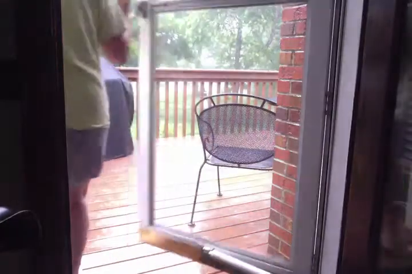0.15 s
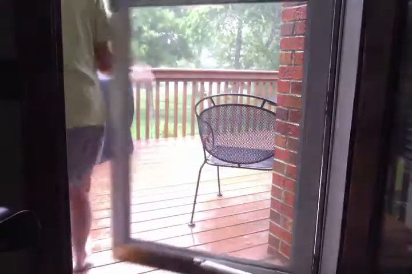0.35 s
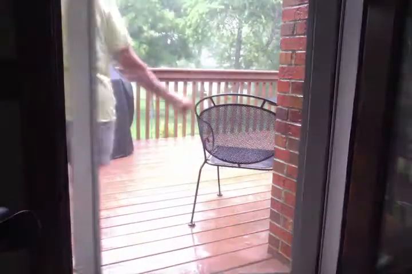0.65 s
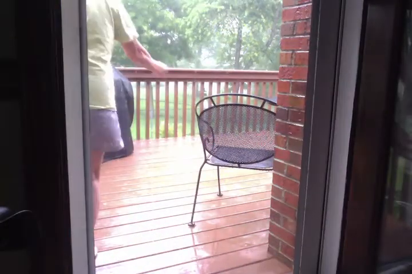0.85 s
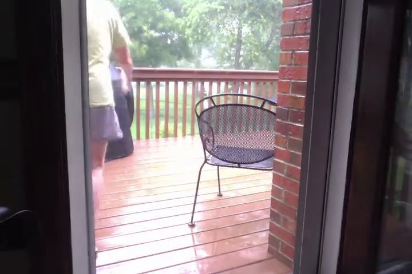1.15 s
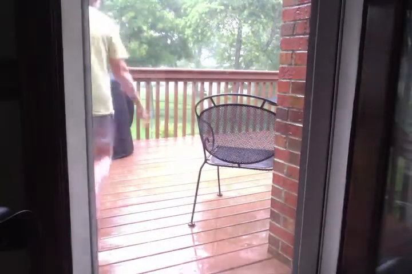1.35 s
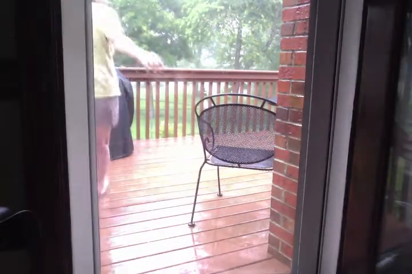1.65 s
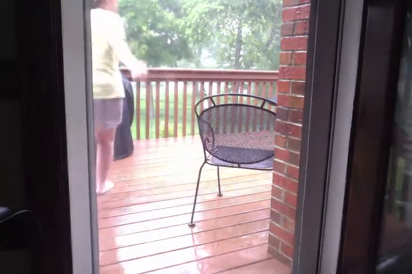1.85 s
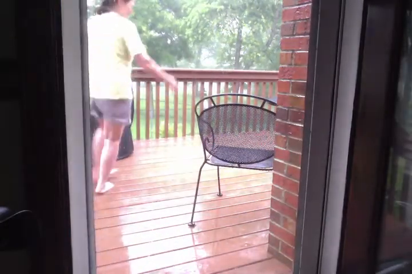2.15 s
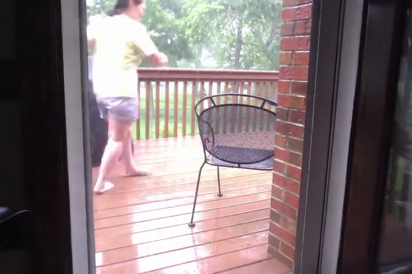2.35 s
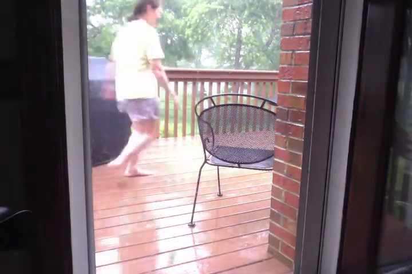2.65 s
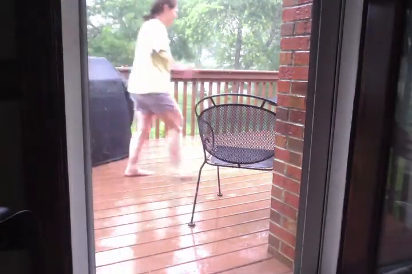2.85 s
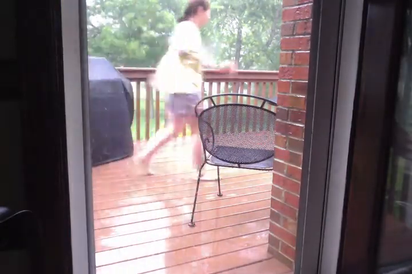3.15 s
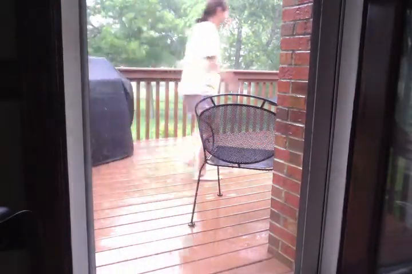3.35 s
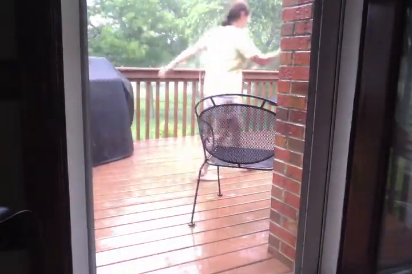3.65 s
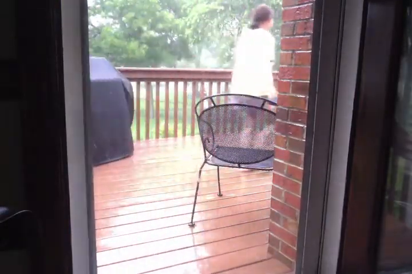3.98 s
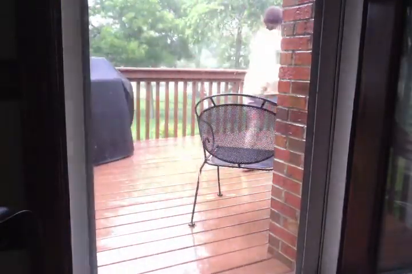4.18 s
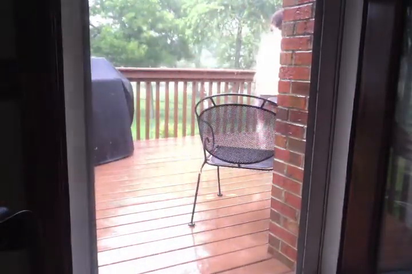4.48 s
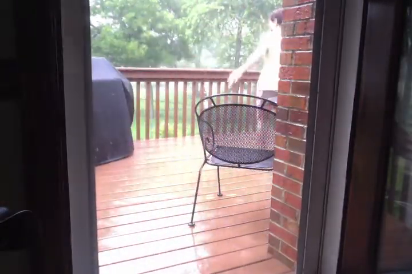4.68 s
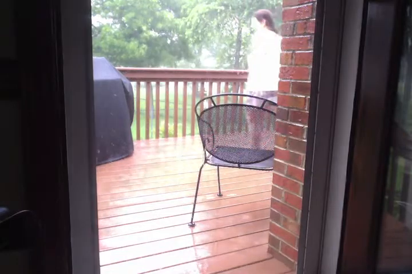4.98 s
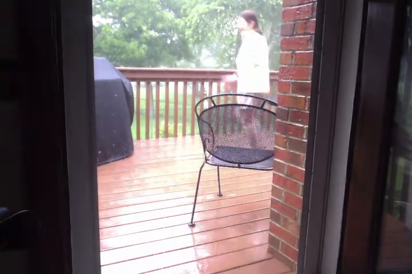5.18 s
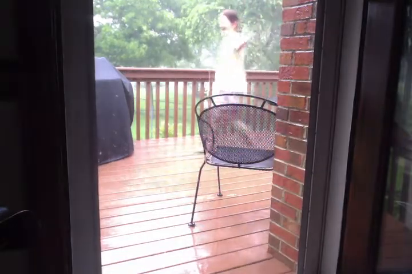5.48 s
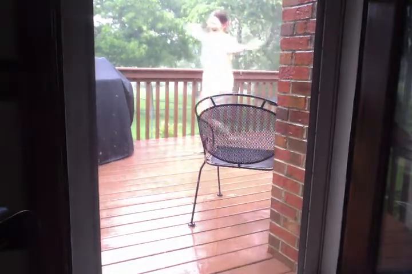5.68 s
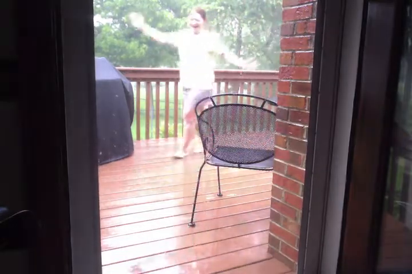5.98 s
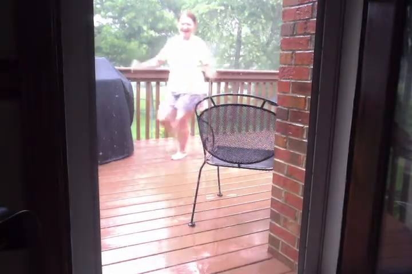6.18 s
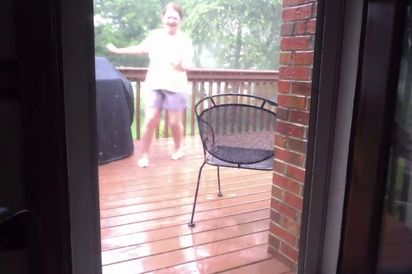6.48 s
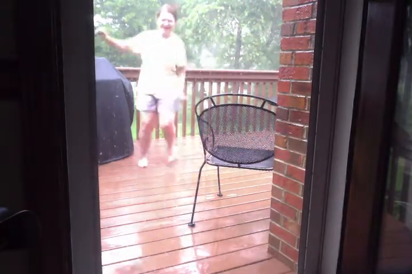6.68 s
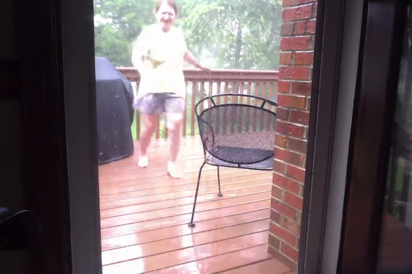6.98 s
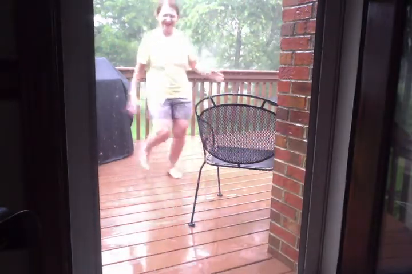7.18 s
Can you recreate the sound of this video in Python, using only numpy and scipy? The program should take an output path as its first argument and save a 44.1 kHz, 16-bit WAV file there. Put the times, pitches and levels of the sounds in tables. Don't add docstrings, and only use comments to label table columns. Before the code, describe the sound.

Heard from inside a hallway, heavy rain patters on a wooden deck. A storm door rattles and knocks open, its hinge giving a brief high squeal, then swings back and the rain drops to a dull wash. Drips tick, the air closer hisses faintly, and two very loud metallic latch clacks shut it. Small ticks follow over muffled rain.

```python
import sys
import numpy as np
from scipy import signal
from scipy.fft import rfft, irfft, next_fast_len
from scipy.io import wavfile
from scipy.ndimage import uniform_filter1d, map_coordinates

SR = 44100
rng = np.random.default_rng(int(sys.argv[2]) if len(sys.argv) > 2 else 0)


def int16_out(signal):
    q = np.round(np.clip(np.atleast_2d(signal).T, -1, 1) * 32767)
    wavfile.write(sys.argv[1], SR, q.astype(np.int16))


def attenuation_scalar(level_db):
    decades = np.asarray(level_db, float) / 20
    return 10 ** decades


N = 323253
TOP_HZ = 15900

# start in seconds, rms level in dB, rattle length in seconds.
LATCH_BLOWS = [
    (5.1416, -7, 0.0085),
    (5.546, -29.5, 0.0036),
    (5.5482, -9, 0.0097),
]


def unit(x):
    return x / np.sqrt(np.mean(x ** 2) + 1e-20)


def along(points, hz):
    f, v = np.transpose(points)
    return np.interp(np.log(hz + 1), np.log(f + 1), v)


def curves(rows):
    s, *cols = np.transpose(rows)
    t = np.arange(N) / SR
    gate = np.clip(np.minimum(t - s[0], s[-1] - t) / 0.004, 0, 1)
    return [np.interp(t, s, c) for c in cols] + [gate]


def wobble(rate_hz, size=N):
    knots = rng.standard_normal(int(N * rate_hz / SR) + 4)
    return map_coordinates(knots, [np.arange(size) * rate_hz / SR])


def filtered(x, response):
    m = next_fast_len(len(x) + 2048)
    return irfft(rfft(x, m) * response(np.fft.rfftfreq(m, 1 / SR)), m)[:len(x)]


def hump(hz, centre_hz, width_hz):
    return 1j * hz * width_hz / (centre_hz ** 2 - hz ** 2 + 1j * hz * width_hz)


def dying(t60_points):
    hz, t, z = signal.stft(rng.standard_normal(SR // 3), SR, nperseg=256)
    z = z * attenuation_scalar(-60 * t / along(t60_points, hz)[:, None])
    return signal.istft(z, SR, nperseg=256)[1][:SR // 3]


def place(out, s, sound, wet_db):
    # frequency in Hz, t60 in seconds.
    hall_t60 = [(300, 0.35), (2000, 0.25), (5000, 0.21), (12000, 0.14)]
    tail = dying(hall_t60)
    tail = attenuation_scalar(wet_db) * tail / np.linalg.norm(tail)
    wet = signal.fftconvolve(np.pad(sound, (300, 0)), tail)
    both = np.pad(sound, (0, len(wet) - len(sound))) + wet
    return out + np.pad(both, (round(s * SR), N))[:N]


def shower(spectrum, patchy_db, drops_per_s, spread_db, share):
    z = signal.stft(rng.standard_normal(N + 512), nperseg=512)[2]
    field = uniform_filter1d(rng.standard_normal(z.shape), size=6, axis=0)
    field = uniform_filter1d(field, size=10, axis=1)
    wash = signal.istft(z * attenuation_scalar(patchy_db * unit(field)), nperseg=512)[1][:N]
    hits = (rng.random(N) < drops_per_s / SR) * rng.standard_normal(N)
    hits = hits * attenuation_scalar(spread_db * np.minimum(rng.exponential(size=N), 3))
    return unit(filtered(unit(wash) + share * unit(hits),
                         lambda hz: attenuation_scalar(along(spectrum, hz)) * (hz < TOP_HZ)))


def splashes(count):
    draw, k = rng.random((count, 3)), np.arange(600)
    hz = 900 * 5 ** draw[:, 1:2]
    size_db = 20 * draw[:, 2:] ** 3
    grain = attenuation_scalar(size_db - 60 * k * hz / SR / 16) * np.sin(2 * np.pi * hz * k / SR)
    at = (draw[:, :1] * N).astype(int) + k
    return unit(np.bincount(at.ravel(), grain.ravel(), N + len(k))[:N])


def rain():
    # frequency in Hz, density in dB per Hz.
    patter_spectrum = [(150, -21.5), (250, -4.5), (375, -3), (469, -1), (770, 1), (1470, -1.5), (2410, -1),
                       (2840, -5.5), (3400, -4), (9000, -33.5), (11700, -51.5), (19800, -120)]
    drum_spectrum = [(24, -42.5), (40, -14.5), (70, -16), (88, -4), (167, -2), (199, 0.5), (500, -12.5),
                     (650, -31.5), (1100, -120)]
    spray_spectrum = [(2060, -28.5), (3500, -6), (3870, 2), (4260, -3), (4740, -3.5), (5380, -6),
                      (6510, -8), (7440, -7.5), (8130, -16.5), (10100, -16.5), (15100, -26.5), (15900, -27)]
    # time in seconds, level in dB.
    gap_level = [(0.0, -33), (0.14, -33.5), (0.41, -31.5), (0.53, -36), (0.61, -31.5), (0.73, -37),
                 (1.0, -44.5), (1.24, -40), (1.41, -39), (1.86, -40.5), (2.33, -43.5), (3.23, -44.5),
                 (4.41, -47.5), (4.9, -52.5), (5.25, -47.5), (6.5, -52), (6.98, -51.5), (7.33, -53)]
    # time in seconds, share from 0 to 1.
    screening = [(0, 0), (2.8, 0.6), (3.6, 0.54), (5, 0.5), (7.33, 0.99)]

    gap_db = curves(gap_level)[0]
    below_wide_db = gap_db + 32
    screened = curves(screening)[0]
    gust = wobble(1.995)
    patter = attenuation_scalar(gap_db - 1.65 + 0.45 * gust) * shower(
        patter_spectrum, patchy_db=2.5, drops_per_s=1500, spread_db=3.0, share=0.39)
    drum = attenuation_scalar(-50 + 0.67 * below_wide_db + 0.46 * wobble(5.1)) * shower(
        drum_spectrum, patchy_db=3.0, drops_per_s=390, spread_db=4.5, share=0.34)
    spray = attenuation_scalar(-39.5 + 1.515 * below_wide_db + 0.5 * gust) * shower(
        spray_spectrum, patchy_db=1.3, drops_per_s=2600, spread_db=9.5, share=0.27)
    finest = filtered(spray, lambda hz: 1 / (1 + (11500 / (hz + 1)) ** 8))
    near = attenuation_scalar(gap_db - 8.0) * (1 - screened) * splashes(count=900)
    return near + patter + drum + spray - screened * finest


def mains_hum():
    # frequency in Hz, level in dB.
    hum_tones = [(177.6, -62.5)]
    t = np.arange(N) / SR
    return sum(attenuation_scalar(db + 3.5 + 0.9 * wobble(1.5)) * np.sin(2 * np.pi * hz * t + 0.3 * wobble(8))
               for hz, db in hum_tones)


def thumps():
    # start in seconds, peak in dB, frequency in Hz.
    thump_events = [(0.016, -38, 230), (0.09, -37.5, 140), (.15, -43, 240), (.328, -36, 350),
                    (.368, -41, 110), (.52, -48, 105), (.65, -30, 254), (.575, -42, 260), (.61, -30, 340),
                    (0.746, -45, 110), (0.197, -49.5, 137), (0.341, -38, 150), (0.419, -37, 135),
                    (0.468, -45, 110), (0.59, -45, 170), (0.691, -44, 161), (1.019, -52, 176),
                    (1.259, -51, 167)]
    out, t = np.zeros(N), np.arange(SR // 5) / SR
    for s, db, hz in thump_events:
        shape = attenuation_scalar(db + 5.0 - 60 * t / 0.11) * (1 - np.exp(-t / 0.0066))
        out = place(out, s - 0.005, shape * np.sin(2 * np.pi * hz * t), -8.0)
    return out


def door_frame():
    # start in seconds, peak in dB, bright part in dB, thud in dB, centre in Hz.
    knocks = [(.017, -26, -25, -6, 1200), (.051, -12, -36, -18, 1690), (.057, -16.5, -34, -14, 1320),
              (.063, -12.5, -31, -14, 1800), (.068, -4, -12.5, -10, 2000), (.074, -5.5, -20, -25, 1780),
              (.086, -9, -12, -20, 1820), (.092, -10.5, -19.5, -15, 1290), (.102, -21, -30.5, -8, 1400),
              (.329, -11.5, -3.5, -16, 2170), (.577, -14, -7.5, -32, 6450), (.586, -14.5, -14, -29.5, 6700),
              (.599, -18.5, -26, -17, 948), (.614, -21.5, -30.5, -1, 800), (.648, -16, -10, -13, 2030),
              (1.241, -13.5, -14, -21, 2200), (1.254, -20.5, -25.5, -4, 1460)]
    # frequency in Hz, density in dB per Hz.
    frame_spectrum = [(150, -45), (250, -22), (618, -0.5), (2090, -6.5), (4650, -7.5), (5830, -10),
                      (8260, -19), (11500, -21.5), (16000, -33.5)]
    rattle_s = 0.0049

    def bright_modes(hz):
        high = hump(hz, 10500, 1500) ** 2 + hump(hz, 12800, 1300) ** 2
        return high + 0.6 * hump(hz, 15000, 1460) ** 2 + 0.43 * hump(hz, 8000, 6000) ** 2

    out, t = np.zeros(N), np.arange(SR // 8) / SR
    shape = (1 - np.exp(-t / 0.0001)) * attenuation_scalar(-60 * np.maximum(t - rattle_s, 0) / 0.043)
    for s, db, bright_db, thud_db, centre_hz in knocks:
        noise = rng.standard_normal((3, len(t)))
        floor = attenuation_scalar(-3.5 + 0.34 * bright_db)
        clack = unit(filtered(noise[0], lambda hz: attenuation_scalar(along(frame_spectrum, hz)) * (
            floor + np.abs(hump(hz, centre_hz, 1100)) ** 2)))
        thud = unit(filtered(noise[1], lambda hz: hump(hz, 400, 460) ** 3))
        bright = unit(filtered(noise[2], bright_modes))
        crack = attenuation_scalar(bright_db - 44 * np.minimum(t / 0.013, 1))
        blow = clack + attenuation_scalar(thud_db) * thud + crack * bright
        out = place(out, s - 0.0005, attenuation_scalar(db - 9.5) * shape * blow, -8.5)
    return out


def pips():
    # start in seconds, peak in dB, frequency in Hz.
    pip_events = [(.017, -35, 9590), (.045, -29, 7300), (1.187, -38, 5700), (1.6, -47, 15000),
                  (1.694, -51, 11500), (2.272, -40, 10800), (2.606, -52, 14700), (2.727, -52, 15000),
                  (2.76, -54, 13500), (3.28, -55, 11800), (6.465, -60, 9420), (2.257, -28.5, 1860),
                  (2.281, -45, 11400), (2.494, -32, 3420), (2.577, -36, 6000), (2.635, -25, 6020),
                  (2.704, -30, 6080), (2.971, -30, 6180), (3.625, -48, 13100), (4.49, -53, 13400),
                  (5.69, -41, 4000), (5.885, -31, 4000), (5.92, -38, 3900), (6.728, -41, 5480),
                  (6.727, -55, 15000)]
    out, t = np.zeros(N), np.arange(SR // 5) / SR
    for s, db, hz in pip_events:
        pair = np.sin(2 * np.pi * hz * t) + 0.39 * np.sin(2 * np.pi * 1.06 * hz * t)
        out = place(out, s, attenuation_scalar(db - 60 * t / 0.023) * (1 - np.exp(-t / 0.00076)) * pair, -13)
    return out


def tick(out, s, db, metal_db, top_db, centre_hz, top_hz, lag_s=0):
    t = np.arange(SR // 25) / SR
    burst = rng.standard_normal((3, len(t))) * (1 - np.exp(-t / 0.0006)) * attenuation_scalar(-60 * t / 0.021)
    drag = attenuation_scalar(2020 * t * (centre_hz < 3100))
    body = unit(filtered(burst[0] * drag, lambda hz: (
        hump(hz, centre_hz, 700) ** 2 + 0.35 * hump(hz, 3000, 3000) ** 3)))
    metal = unit(filtered(burst[1], lambda hz: (
        hump(hz, 6160, 1500) ** 2 + 0.5 * hump(hz, 7800, 1000) ** 2 + 0.27 * hump(hz, 9800, 1500) ** 2)))
    top = unit(filtered(burst[2], lambda hz: (
        hump(hz, top_hz, 830) * hump(hz, top_hz, 2500) ** 2 + 0.3 * hump(hz, 14700, 900) ** 2)))
    late = np.roll(body + attenuation_scalar(metal_db) * metal, round(lag_s * SR))
    return place(out, s - 0.0007, attenuation_scalar(db - 16.5) * (late + attenuation_scalar(top_db) * top), -13)


def drips_and_settling():
    # start in seconds, peak in dB, metal part in dB, body frequency in Hz.
    drips = [(0.2129, -22, -18, 3450), (0.469, -20.5, -6, 1490), (0.637, -27, -3, 4170),
             (0.648, -19, -2, 4300), (0.6844, -32, -8, 4580), (0.695, -21, -9, 2230),
             (0.718, -23.5, -7, 1540), (0.774, -27, -20, 1500), (0.781, -26, -1, 4600),
             (1.1982, -31, -17, 3770), (1.347, -32, -25, 3560), (1.431, -23.5, -32, 2750),
             (1.622, -40, 0, 4000), (1.751, -35, -25, 2190), (1.837, -46, 3, 4200), (1.872, -30, -25, 1230),
             (1.6736, -25, -29, 2740), (1.6987, -30, 1.5, 1860), (1.902, -25, -29, 2920),
             (2.254, -24, -22, 1820), (2.2782, -28, -28, 3730), (2.419, -33, -23, 1400),
             (2.494, -33.5, -17, 3600), (2.6323, -27.5, -11.5, 2010), (2.6483, -36, 1.5, 1850),
             (2.752, -37.5, -25, 1190), (2.908, -40, -25, 1120), (3.002, -49, 2, 1500),
             (3.212, -32, -18, 1480), (2.705, -37, -4, 1860), (2.97, -42.5, 6, 1160),
             (3.0611, -32.5, -14, 1320), (3.6362, -35.5, -30, 1850), (3.7843, -35.5, -25, 3850),
             (4.8858, -36, -32, 1660)]
    settling = [(5.326, -39, -16, 1470), (5.3642, -39, -15, 1520), (5.414, -37.5, -9.5, 1950),
                (5.449, -43, -16, 2500), (5.481, -39, -10, 1450), (5.5135, -43, -4, 4040),
                (5.659, -40, 0, 1426), (5.689, -37, -14, 4020), (5.8791, -38.5, 3, 1400),
                (5.883, -32.5, -6.5, 4030), (5.914, -38, -30, 3450), (5.989, -47.5, 7, 1380),
                (6.0516, -37, -5, 2290), (6.2193, -48.5, 2, 3320), (6.261, -52.5, -4, 1200),
                (6.3253, -43, -11.5, 2380), (6.3814, -47, -8, 2310), (6.727, -47, -1, 1733),
                (6.7404, -44.5, 3, 1700), (6.7944, -46, -6, 1066), (6.8657, -45.5, -5, 2400),
                (7.0034, -51, 1.5, 1650), (7.0804, -50, -5.5, 2390), (7.1687, -51, -0.5, 1380),
                (7.2704, -40.5, -16, 1736), (7.2844, -46, -9, 3000)]
    home_s = LATCH_BLOWS[-1][0]
    out = np.zeros(N)
    for s, db, metal_db, hz in drips:
        out = tick(out, s, db, metal_db, -42, hz, 11200)
    for s, db, metal_db, hz in settling:
        top_hz = 12700 if s > home_s else 10900
        out = tick(out, s, db, metal_db, metal_db - 7, hz, top_hz, lag_s=0.0024)
    return out


def hinge():
    # time in seconds, frequency in Hz, level in dB.
    squeal_modes = [
        [(.425, 5510, -62.5), (.462, 5410, -20), (.509, 5270, -17.5), (.519, 5050, -27.5), (.523, 4650, -31),
         (.535, 4620, -33), (.539, 4330, -10), (.553, 4230, -36), (.582, 4300, -37.5)],
        [(.566, 3290, -32.5), (.574, 3044, -29), (.58, 3252, -20.5), (.598, 3293, -34.5), (.69, 3320, -43)],
    ]
    # time in seconds, swell in dB, half length in seconds.
    slips = [(.5155, 7, .0015), (0.519, -13.5, 0.0027), (0.534, 12, 0.0017), (0.535, -10.5, .001),
             (0.5428, 7.5, 0.0028), (0.5457, -14, 0.00075), (0.548, 8, .0018), (.5128, -9, .001),
             (.563, -8, .003), (0.568, 7, .004), (.575, 15, 0.0013), (0.582, 11, 0.004)]
    # second harmonic in dB, third harmonic in dB.
    overtones = [
        (-14, -31.5),
        (-10, -39),
    ]
    largest_swing = 0.58

    t = np.arange(N) / SR
    grips_db = sum(db * np.exp(-((t - s) / half_s) ** 2) for s, db, half_s in slips)
    loose = np.clip((t - 0.51) / 0.0075, 0.05, 1)
    size = attenuation_scalar(grips_db + 3.1 * loose * wobble(250.9) + 4.5)
    drift = 1 + 0.011 * loose * wobble(300)
    out = np.zeros(N)
    for rows, (second_db, third_db) in zip(squeal_modes, overtones):
        hz, db, gate = curves(rows)
        swing = largest_swing * np.tanh(size * attenuation_scalar(db) / largest_swing)
        phase = 2 * np.pi * np.cumsum(hz * drift) / SR
        harmonics = attenuation_scalar(second_db) * np.sin(2 * phase) + attenuation_scalar(third_db) * np.sin(3 * phase)
        out += gate * (swing * np.sin(phase) + swing ** 1.65 * harmonics)
    return place(np.zeros(N), 0, out[:SR], -12)


def closer():
    # time in seconds, level in dB.
    intake_level = [(.78, -64), (.86, -54), (.9, -41.5), (.97, -40.5), (1.01, -44), (1.06, -45.5),
                    (1.112, -47), (1.156, -59)]
    sigh_level = [(2.3, -68), (2.9, -55.5), (3.5, -52), (4, -49), (4.4, -46), (4.7, -47.5), (4.88, -52),
                  (5.1, -67)]
    leak_level = [(2.4, -59), (2.6, -68), (3.2, -56), (3.9, -64.5), (4.4, -63)]
    # centre in Hz, width in Hz, level in dB.
    valve_modes = [(1014, 14, 2), (1436, 44, 2.5), (2310, 390, -4.5), (2740, 93, 1.5), (3450, 90, -10.5),
                   (3850, 270, -8.5), (4416, 62, -6.5), (4960, 100, -7.5), (5710, 60, -9.5),
                   (6640, 140, -16)]
    barrel_modes = [(595, 250, -2), (2270, 320, -3), (3700, 400, -9)]
    # frequency in Hz, density in dB per Hz.
    nozzle_spectrum = [(3410, -51), (5800, -26), (6630, -3), (7070, 0.5), (7530, -9), (7750, -30),
                       (8200, -22), (10700, -40), (18000, -120)]

    def valve(hz):
        tube = sum((-1) ** k * attenuation_scalar(db) * hump(hz, centre_hz, 2.0 * width_hz + 25)
                   for k, (centre_hz, width_hz, db) in enumerate(valve_modes))
        return (tube + attenuation_scalar(-35.0) * hump(hz, 10700, 3000)) / (1 + (hz / 12800) ** 12)

    air = rng.standard_normal((3, N))
    sigh = attenuation_scalar(curves(sigh_level)[0]) * unit(filtered(air[0], valve))
    leak_db, leak_gate = curves(leak_level)
    whistle = unit(filtered(air[1], lambda hz: hump(hz, 6180, 250) + 0.24 * hump(hz, 7200, 440)))
    leak = leak_gate * attenuation_scalar(leak_db - 1.5) * whistle
    intake_db, intake_gate = curves(intake_level)
    barrel = unit(filtered(wobble(15000), lambda hz: sum(
        attenuation_scalar(db) * hump(hz, centre_hz, width_hz) ** 2 for centre_hz, width_hz, db in barrel_modes)))
    nozzle = unit(filtered(air[2], lambda hz: attenuation_scalar(along(nozzle_spectrum, hz))))
    intake = intake_gate * attenuation_scalar(intake_db + 1.0 * wobble(41.1)) * (nozzle + attenuation_scalar(-5) * barrel)
    return sigh + leak + intake


def far_engine():
    # time in seconds, frequency in Hz, level in dB.
    engine_glide = [(1.8, 52.1, -83), (2.6, 59.8, -69), (3.31, 70.8, -58), (3.69, 73.3, -67),
                    (4.3, 83.3, -64), (4.8, 91.3, -56), (5.4, 95.5, -75.5), (5.96, 88.8, -65.5),
                    (6.1, 82.4, -81), (6.33, 75.4, -69), (6.71, 69.3, -64.5), (7.33, 68.0, -71)]
    hz, db, gate = curves(engine_glide)
    return gate * attenuation_scalar(db + 5.5 + 1.66 * wobble(20)) * np.sin(2 * np.pi * np.cumsum(hz) / SR)


def latch():
    # frequency in Hz, density in dB per Hz.
    blow_spectra = [
        [(120, -64), (200, -42.5), (558, -22.5), (1160, -9), (1560, -32.5), (1770, 1), (2610, 2.5), (2860, -11),
         (4270, -0.5), (5040, -20.5), (16000, -38)],
        [(120, -62), (200, -52), (529, -22), (1250, -6.5), (1590, -2.5), (2610, -7.5), (3310, -12.5),
         (3970, 0.5), (4770, -11), (5420, -6), (8120, -28.5), (10100, -19.5), (16000, -29.5)],
    ]
    buzz_spectra = [
        [(120, -52), (200, -30), (401, -14.5), (709, 3.5), (950, -13.5), (1300, -0.5), (1680, -8.5),
         (1840, 1.5), (2420, -5), (2610, -6), (4040, -1.5), (6050, -25.5), (9580, -28), (16000, -42.5)],
        [(120, -37), (200, -12), (305, -18.5), (366, -8.5), (647, -2), (763, -1.5), (836, -4), (1250, -5.5),
         (1980, -4), (2800, -14.5), (3490, -11), (4600, -5), (7680, -23), (10300, -16.5), (16000, -32)],
    ]
    # frequency in Hz, t60 in seconds.
    buzz_t60 = [(300, 0.21), (1500, 0.2), (4000, 0.29), (7000, 0.21), (14000, 0.24)]
    # frequency in Hz, level in dB, lag in seconds, hold in seconds.
    shaken_modes = [
        [(1093, -22.5, 0.0037, .009), (1850, -14, 0.00062, 0.0077), (2290, -10, 0, .008), (2625, -9.5, 0, .009),
         (3308, -10.5, 0.0015, .008), (3900, -11.5, 0.00069, 0.00818), (4284, -8, 0.0012, 0.0077)],
        [(619, -19, 0.0055, 0.0068), (1553, -11.5, 0.0051, 0.00576), (2627, -13, .001, 0.00397),
         (4050, -6.5, 0.0012, .005), (4050, -11, .008, 0.0031), (5287, -8, 0.0013, .004),
         (5670, -14.5, 0.000998, 0.0036)],
    ]
    # frequency in Hz, level in dB, t60 in seconds (held to 0.2-0.3 after meeting,
    # 0.28-0.3 after going home).
    ring_modes = [
        [(700, -6.5, 0.22), (1314, -2, 0.095), (1800, -8.5, 0.24), (2250, -9.5, 0.22), (2640, -5, 0.2),
         (2850, -6.5, 0.2), (3241, -10.5, 0.3), (3410, -3, 0.18), (3510, -15, 0.54), (3500, -3, 0.2),
         (3900, -10, 0.3), (4060, -7, 0.4), (4150, -10, 0.41), (4490, -18.5, 0.41)],
        [(384, -11, 0.41), (955, -1, 0.21), (1437, -8.5, 0.38), (1582, -14, 0.47), (1998, -5, 0.2),
         (2628, -17, 0.46), (2939, -20, 5.0), (3584, 0.5, 0.22), (3935, 0.5, 0.18), (4120, -5, 0.25),
         (4700, -10.5, 0.68), (5050, -12.5, 0.26), (5310, -10, 0.38), (5710, -15, 0.27)],
    ]

    out, t = np.zeros(N + SR), np.arange(SR // 3) / SR

    def tone(hz):
        return np.sin(2 * np.pi * (hz * t + rng.random()))

    for (s, db, rattle_s), k in zip(LATCH_BLOWS, (0, 1, 1)):
        blow = unit(filtered(rng.standard_normal(len(t)), lambda hz: attenuation_scalar(along(blow_spectra[k], hz))))
        blow *= attenuation_scalar(-250 * t - 60 * np.maximum(t - rattle_s, 0) / 0.012)
        blow /= np.sqrt(np.mean(blow[t < rattle_s] ** 2))
        shaken = np.zeros(len(t))
        for hz, mode_db, lag_s, hold_s in shaken_modes[k]:
            fall_db = 60 * np.maximum(t - lag_s - hold_s, 0) / 0.008
            shaken += attenuation_scalar(mode_db + 3.0 - fall_db) * np.clip((t - lag_s) / 0.0012, 0, 1) * tone(hz)
        buzz = unit(filtered(dying(buzz_t60), lambda hz: attenuation_scalar(along(buzz_spectra[k], hz)) * (hz < TOP_HZ)))
        ring = np.zeros(len(t))
        for hz, mode_db, t60_s in ring_modes[k]:
            fall_db = 60 * t / np.clip(t60_s, 0.2 + 0.08 * k, 0.3)
            ring += attenuation_scalar(mode_db - fall_db) * (1.1 + wobble(160, size=len(t))) * tone(hz)
        hard = db > -20
        sound = attenuation_scalar(-3.0) * blow + hard * shaken + attenuation_scalar(-25) * buzz + attenuation_scalar((-21, -18)[k]) * ring
        out[round(s * SR):][:len(t)] += attenuation_scalar(db) * (1 - np.exp(-t / 0.00033)) * sound
    return filtered(out[:N], lambda hz: 1 / (1 + (200 / (hz + 1)) ** 4))


def microphone_hiss():
    noise = rng.standard_normal(N)
    return attenuation_scalar(-89) * unit(filtered(noise, lambda hz: (hz > 8000) / (1 + (hz / 14600) ** 40)))


def scene():
    rest = rain() + mains_hum() + thumps() + door_frame() + pips() + drips_and_settling()
    rest = rest + hinge() + closer() + far_engine() + microphone_hiss()
    return (latch() + filtered(rest, lambda hz: hz < TOP_HZ))[None]


def low_pass(x):
    return signal.sosfilt(signal.butter(12, 16680, fs=SR, output="sos"), x)


def record(dry):
    heard = filtered(dry[0], lambda hz: (hz < 1.05 * TOP_HZ) / (1 + (44 / (hz + 1)) ** 6))[None]
    return low_pass(heard / (1 + np.abs(heard) ** 8) ** (1 / 8))


dry = scene()
out = record(dry)
int16_out(out)
```